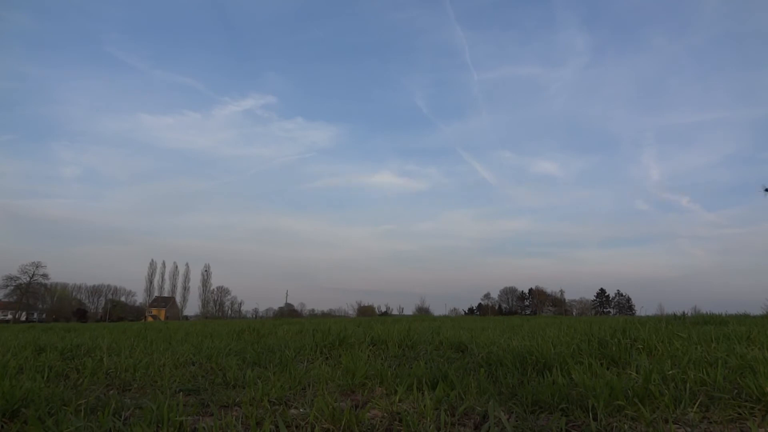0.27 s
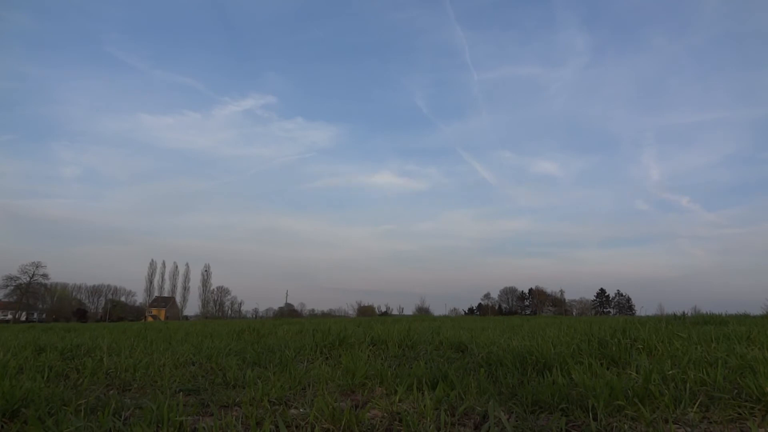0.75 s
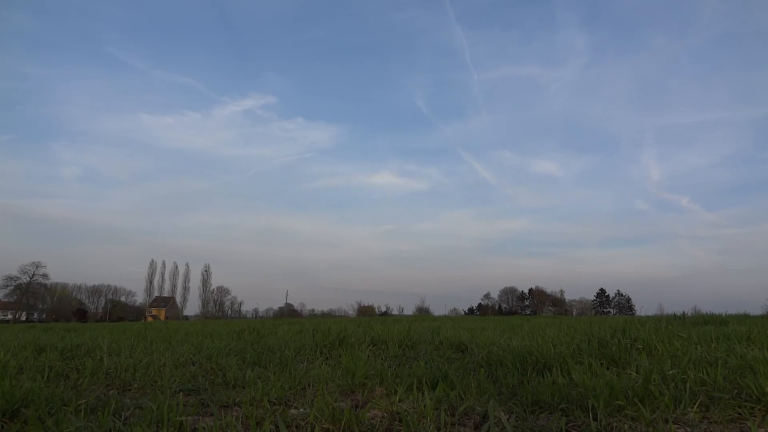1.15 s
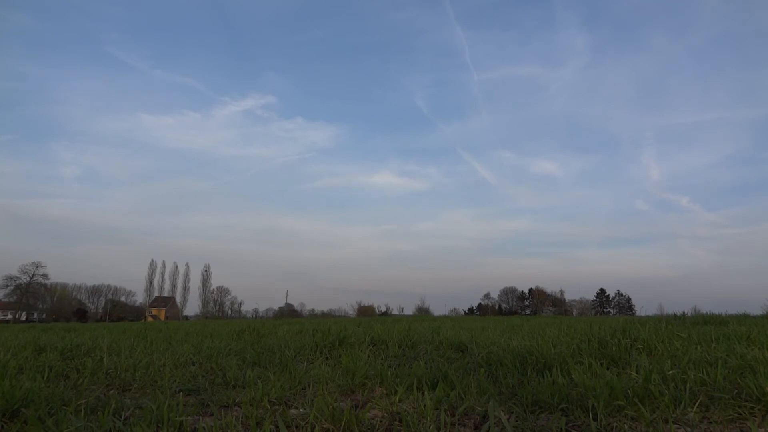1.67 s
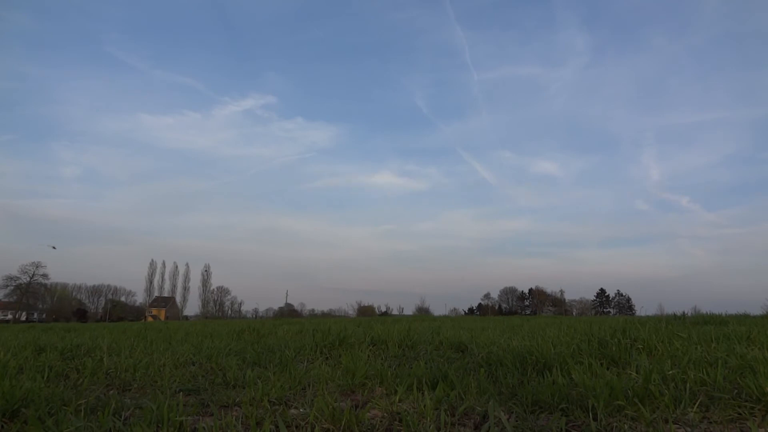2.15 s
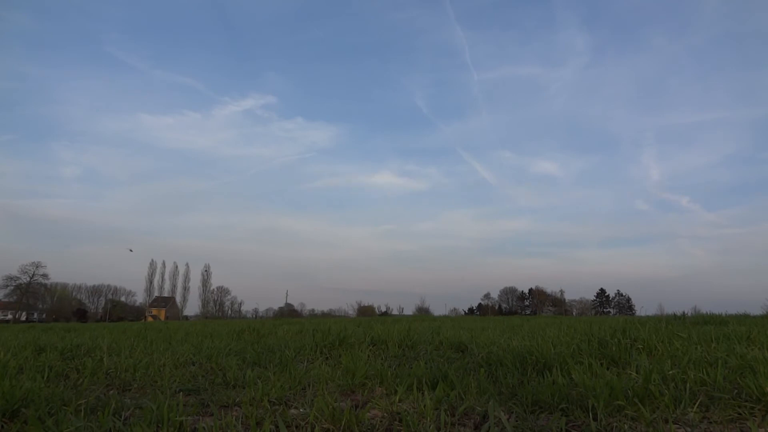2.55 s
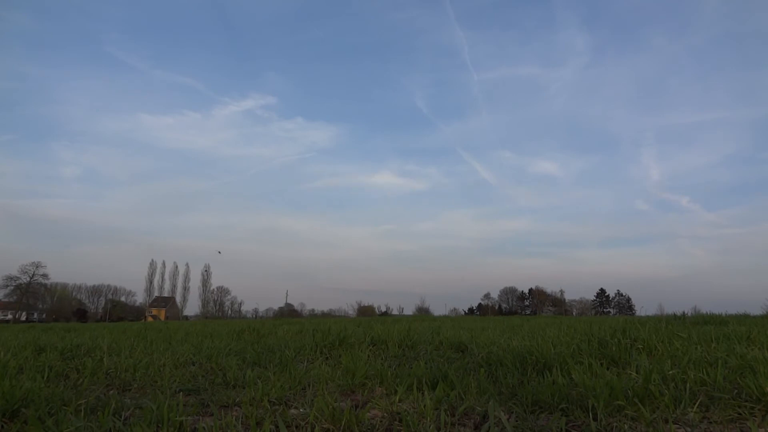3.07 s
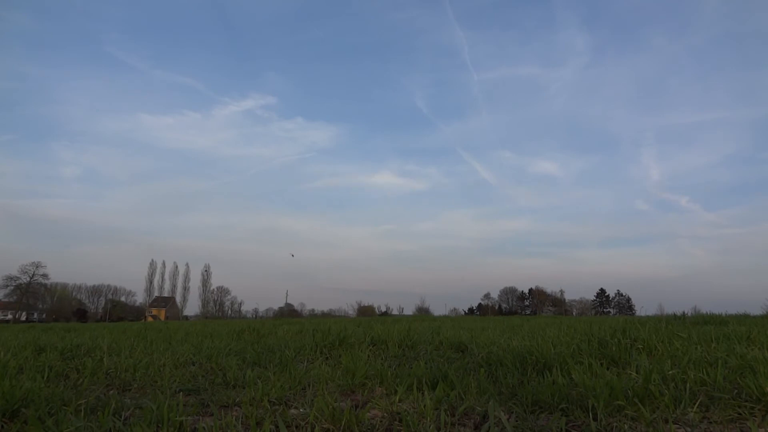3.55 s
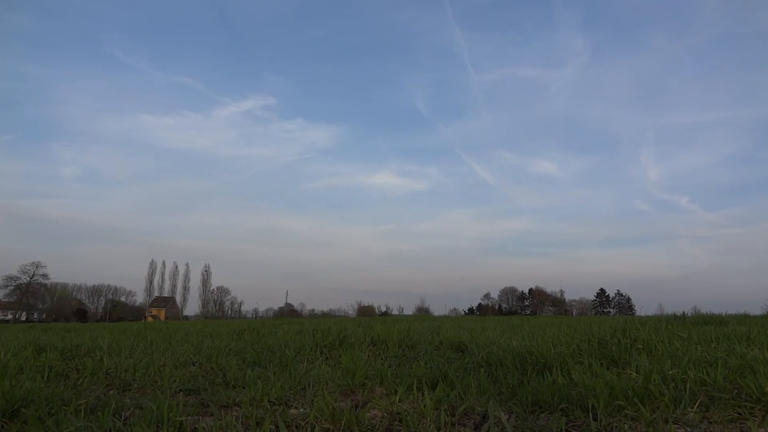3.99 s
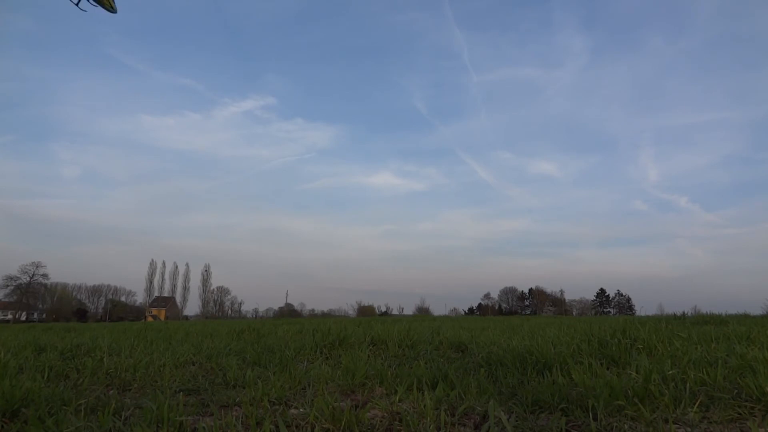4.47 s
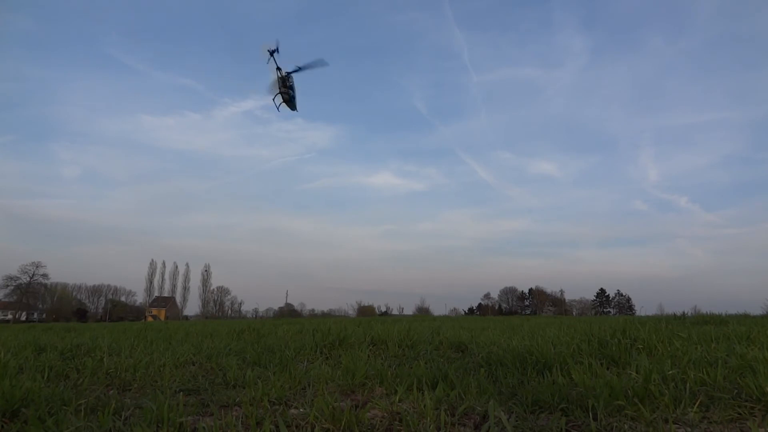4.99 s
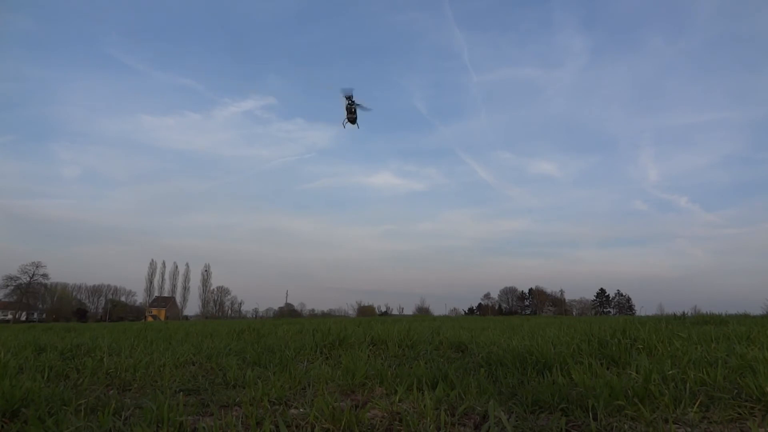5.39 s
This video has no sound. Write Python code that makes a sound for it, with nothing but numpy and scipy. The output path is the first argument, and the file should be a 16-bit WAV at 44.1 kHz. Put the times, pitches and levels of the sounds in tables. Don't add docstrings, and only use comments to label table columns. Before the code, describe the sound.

A toy-sized electric helicopter flies off: bright hiss and a piercing whine drop away within a second or so, flutter in the distance and grow thin. A little past the middle the scene switches without warning to the same machine close by, buzzing, whining and hissing strongly. Open field, dry, no echo, heard through a small camera's stereo microphones.

```python
import sys
import numpy as np
from scipy import signal
from scipy.fft import rfft, irfft, next_fast_len
from scipy.io import wavfile
from scipy.ndimage import uniform_filter1d

SR = 44100
rng = np.random.default_rng(int(sys.argv[2]) if len(sys.argv) > 2 else 0)


def pcm_store(signal):
    levels = np.round(np.clip(np.atleast_2d(signal), -1, 1) * 32767)
    wavfile.write(sys.argv[1], SR, levels.astype(np.int16).T)


def field_ratio(decibels):
    return 10 ** (np.asarray(decibels, dtype=float) / 20)


N = 248283
T = np.arange(N) / SR
CUT_S, CUT_FADE_S = 3.6145, 0.0025
ROTOR, LAY, MOTOR, MESH = 18.61 / 7770, 70 / 7770, 354.8 / 7770, 688.5 / 7770


def curves(rows):
    rows = np.array(rows)
    first = rows[rows[:, 0] < CUT_S].T
    second = rows[rows[:, 0] > CUT_S].T
    fade = np.clip((T - CUT_S) / CUT_FADE_S, 0, 1)
    return [(1 - fade) * np.interp(T, first[0], a) + fade * np.interp(T, second[0], b)
            for a, b in zip(first[1:], second[1:])]


def at_hz(rows, hz):
    f, v = np.transpose(rows)
    return np.interp(np.log(hz + 1.), np.log(f + 1.), v)


def walk(rate):
    hold = int(SR / rate)
    steps = np.repeat(rng.standard_normal(N // hold + 1), hold)
    return uniform_filter1d(uniform_filter1d(steps, hold), hold)[:N]


# pitch_hz, share common to both channels (0 to 1)
LIKENESS = [(60, 0.9), (130, 1), (290, 0.98), (640, 0.52), (1410, 0.65), (3100, 0.9), (6820, 0.94),
            (15000, 0.99)]


def band(hz, octaves):
    size = next_fast_len(N)
    f = np.fft.rfftfreq(size, 1 / SR)
    shape = np.cos(np.pi / 2 * np.clip(np.log2((f + 1) / hz) / octaves, -1, 1))
    noise = rng.standard_normal((2, N))
    mid, side = irfft(rfft(noise, size) * shape)[:, :N] * np.sqrt(SR / 2)
    common = np.clip(at_hz(LIKENESS, hz), 0, 1)
    return np.sqrt((1 + common) / 2) * mid + np.sqrt((1 - common) / 2) * side * np.array([[1], [-1]])


def tone(turns, db, flutter_db, wobble):
    angle = 2 * np.pi * (turns + rng.random()) + wobble * walk(22)
    return np.sqrt(2) * field_ratio(db + flutter_db * walk(14)) * np.sin(angle)


CLOSE_DB = -23
PARTS = {"mesh": (-35, 0.77), "motor": (-35, 0.87), "overtone": (-35.5, 0.5), "whine": (-33, 0.9),
         "below": (-41, 0.91), "above": (-37, 0.89), "minus mesh": (-34.5, 0.88), "plus mesh": (-36.5, 1),
         "octave": (-35, .95), "upper mesh": (-33.5, 0.86), "thrum": (-66, 0.63), "tail 5": (-53.5, 0.17),
         "tail 10": (-46, 0.62), "tail 4": (-77.5, -0.51), "hiss low": (-45.5, 0.6),
         "hiss mid": (-34.5, 0.49), "hiss high": (-34, 0.81), "top loss": (.5, .06), "field": (-7, -0.26)}
GEAR_TURNS = {"mesh": [(0, 0.4, -6.5), (1.5, 0.18, -18), (1.88, .12, -18), (3.9, 0.27, 4)],
              "motor": [(0, 0.48, -20.5), (1.95, 0.081, -19), (1.6, .2, -8.5), (3.55, 0.38, -7),
              (3.62, 0.12, -16), (4.1, .1, -7), (4.55, 0.17, -17)], "upper mesh": [(.3, 0.74, 4.5),
              (1.6, 0.26, 8), (4.4, 0.23, 5)], "overtone": [(.1, 0.21, 3), (.65, 0.098, -4),
              (1.5, 0.31, -9.5), (3.75, 0.2, -4.5), (4.35, .25, 4), (4.72, 0.068, 2.5), (5.3, 0.23, -13)],
              "thrum": [(0, 0.49, 6.5), (1.4, 0.34, -10), (3.6, .2, 4), (3.9, .25, -3.5)],
              "tail 5": [(0.05, 0.37, -11), (1, 0.33, -5), (4.5, 0.29, -14.5)], "tail 10": [(.3, 0.18, -21),
              (1.4, 0.35, -3.5), (2.55, 0.29, -10), (3.65, 0.5, -11), (5.5, 0.4, 8.5)],
              "tail 4": [(.3, 0.38, 14), (1.25, .14, -19), (1.65, .15, 3.5), (3.9, .13, 16),
              (4.55, 0.2, -6)]}
WHINE_TURNS = {"whine": [(.5, 0.26, 3.5), (1.45, .15, 5), (1.88, 0.073, 16), (3.62, 0.024, 9),
               (3.74, 0.054, 7.5), (4.75, .08, 3.5)], "below": [(1.1, 0.31, 16), (1.85, .15, 4),
               (2.65, .25, 9), (3.48, .11, -10), (3.62, .04, -13), (5.25, 0.43, 7)], "above": [(.7, .12, 5),
               (1.01, .07, -8), (1.7, 0.24, 9), (4.07, .07, -9), (4.55, .13, 8), (5.03, 0.11, -18),
               (5.4, 0.098, 7)], "octave": [(.9, .25, -4), (1.6, 0.25, 0), (2.8, .5, -6), (5.2, .3, 2)],
               "minus mesh": [(1.35, 0.4, 6.5), (1.95, 0.11, 3.5), (4.76, 0.08, -1)],
               "plus mesh": [(.58, .07, -16), (1.0, 0.093, -5), (1.28, 0.095, 12), (1.85, 0.14, 11),
               (2.68, 0.1, 11), (3.96, .08, -11), (4.45, 0.14, -12), (5.41, .07, 7)]}
AIR_TURNS = {"hiss low": [(.9, 0.86, -5), (3.65, 0.093, 2)], "hiss mid": [(1.29, 0.076, -4.5),
             (1.7, 0.12, 2.5), (3.65, 0.15, 7), (4.0, .1, -1.5), (4.55, 0.51, 4.5), (5.3, 0.24, 2)],
             "hiss high": [(1.7, 0.76, 2.7), (4.29, 0.22, 2.16)], "top loss": [(1.4, .5, -11.5),
             (3.3, .35, -5), (4.4, 0.16, -2)], "field": [(0.27, 0.85, 12.8)]}


def part(name, near_db):
    close_db, share = PARTS[name]
    level_db = close_db + share * (near_db - CLOSE_DB)
    turns = {**GEAR_TURNS, **WHINE_TURNS, **AIR_TURNS}[name]
    for centre_s, half_s, db in turns:
        same_shot = (T > CUT_S) == (centre_s > CUT_S)
        level_db = level_db + db * np.exp(-.5 * ((T - centre_s) / half_s) ** 2) * same_shot
    return level_db


# pitch_hz, density_db (per Hz)
FIELD = [(15, -69), (25, -30), (366, -9.5), (413, -13.5), (569, -20), (709, -51), (902, -53), (1400, -5),
         (3000, -15), (3900, -48), (6600, -120)]
FIELD_DB = -56.5


def field(duck_db):
    out = sum(field_ratio(at_hz(FIELD, hz) + 2.4 * walk(3.12)) * band(hz, 0.42)
              for hz in 25 * 2 ** np.arange(0, 7.5, .5))
    return field_ratio(FIELD_DB + duck_db) * out / np.sqrt(np.mean(out ** 2))


def downwash(thrum_db):
    return field_ratio(thrum_db - 24.5) * band(127.0, 1.8)


BAND_HZ = [1030, 3900, 6600, 11000, 15000]
# pitch_hz, level_db
HISS = [(60, -19), (140, -30), (400, -13), (470, -12.5), (560, 0.5), (700, -4), (1030, 1), (2000, 0.5),
        (2900, 1.5), (6000, -2), (6600, -2.5), (7200, 5), (8800, 3), (10500, 2.5), (15700, 0)]


def blades(density_db, turns):
    blade_beat = 0.028 * np.sin(4 * np.pi * ROTOR * turns)
    lay_beat = 0.061 * np.sin(4 * np.pi * LAY * turns)
    gust, out = walk(6.5), 0
    for hz in 79 * 2 ** np.arange(0, 7.9, 1 / 3):
        place = np.interp(np.log(hz), np.log(BAND_HZ), np.arange(5))
        k = min(int(place), 3)
        db = density_db[k] + (place - k) * (density_db[k + 1] - density_db[k])
        flicker_db = 0.86 * gust + 0.95 * walk(11) + 1.06 * walk(2.476)
        out = out + field_ratio(db + at_hz(HISS, hz) + flicker_db) * band(hz, 1 / 3)
    return (1 + blade_beat + lay_beat) * out


# low_hz, high_hz
GRASS_HZ = [
    (3250, 4050),
    (1750, 2450),
]
# top hiss at onset [dB], span to full depth [dB], share cancelled
GRAZE_DB = [-36, -45]
GRAZE_SPAN_DB = [14, 5]
GRAZE_SHARE = [.66, .37]
HOVER_SHARE = [.03, .15]
SUNK_SHARE = [.1, .48]
SINK_S = (4.9, 5.2)


def grass(air, near_db):
    for k, edges in enumerate(GRASS_HZ):
        graze = GRAZE_SHARE[k] * np.clip((GRAZE_DB[k] - near_db) / GRAZE_SPAN_DB[k], 0, 1)
        hover = np.interp(T, SINK_S, [HOVER_SHARE[k], SUNK_SHARE[k]])
        bandpass = signal.butter(2, edges, "band", fs=SR, output="sos")
        air = air - np.where(T < CUT_S, graze, hover) * signal.sosfiltfilt(bandpass, air)
    return air


# start_s, pitch_hz
TAIL = [(0, 81.6), (1.2, 80.9), (1.8, 82.1), (2.11, 82.2), (2.41, 82.25), (3.01, 82.7), (3.31, 84),
        (3.6, 84), (3.63, 81.2), (3.9, 81.6), (4.62, 82), (5.13, 82.9), (5.38, 82.1), (5.63, 83.4)]
# shaft multiple, index of the part that sets the level, level_db under it
TAIL_MORE = [(2, 1, -22), (2, 2, -10), (3, 2, -10), (3, 1, -24), (6, 2, -10), (15, 1, -8), (20, 0, -3),
             (25, 0, -6), (30, 0, -8)]


def tail_rotor(near_db):
    level_db = [part(name, near_db) for name in ("tail 5", "tail 10", "tail 4")]
    turns = np.cumsum(curves(TAIL)[0]) / SR
    main = [(5, 0, 0), (10, 1, 0), (4, 2, 0)]
    return sum(tone(n * turns, level_db[int(k)] + db, 2.05, 0.11 + 0.041 * n)
               for n, k, db in main + TAIL_MORE)


# start_s, pitch_hz
SPEED = [(0, 7752), (.27, 7695), (.6, 7674), (.9, 7612), (1.6, 7680), (2.16, 7847), (2.31, 7800),
         (2.8, 7852), (3.18, 7985), (3.614, 8015), (3.619, 7965), (4.04, 7755), (4.27, 7935), (4.42, 7915),
         (4.7, 7750), (4.85, 7806), (4.96, 7758), (5.63, 7782)]
LINES_AT = [(MESH, 0), (MESH - ROTOR, 0), (MESH - LAY, 0), (MESH + LAY, 0), (2 * MOTOR, 1), (2 * MESH, 2),
            (2 * MESH + ROTOR, 2), (2 * MESH - ROTOR, 2), (2 * MESH + LAY, 2), (3 * MESH, 9),
            (3 * MESH + ROTOR, 9), (4 * MESH + ROTOR, 9), (1, 3), (1 + ROTOR, 3), (1 + LAY, 3),
            (1 + 2 * LAY, 3), (1 - LAY * 6, 4), (1 - LAY * 7, 4), (1 + LAY * 6, 5), (1 - MESH, 6),
            (1 - MESH - ROTOR, 6), (1 + MESH, 7), (1 + MESH + ROTOR, 7), (1 + 2 * MESH + ROTOR, 7),
            (1 + MESH + LAY * 6, 7), (2, 8), (2 - LAY * 6, 8), (2 - LAY * 12, 8),
            (2 - LAY * 6 - MESH - ROTOR, 8), (MOTOR * 33, 7), (MOTOR * 15, 3), (4 * MESH + MOTOR, 2)]
LINES_DB = [1.2, -16, -19, -21, 1.2, -.5, -5, -12, -14, -19, -18, -18, -.5, -9, -11, -11, .5, -13, .5, -3.5,
            -2, -2.5, -2.5, -8, -9, -1, -7, -8, -8, -14, -21, -17]
# share of the whine, level_db over the thrum
HUM = [
    (2 * LAY, 0),
    (3 * LAY, 0.5),
    (4 * LAY, -1.2),
    (MOTOR, 0),
    (MESH + MOTOR, 11),
    (3 * MOTOR, 7.2),
    (MESH + 4 * LAY, 0.77),
]


def drive(hiss_db, thrum_db):
    level_db = [part(name, hiss_db) for name in list(PARTS)[:10]]
    turns = np.cumsum(curves(SPEED)[0]) / SR
    lines = sum(tone(share * turns, level_db[k] + db, .7 + 1.8 * share, .05 + 1.2 * np.sqrt(share))
                for (share, k), db in zip(LINES_AT, LINES_DB))
    hum = sum(tone(share * turns, thrum_db + db + 2 * walk(1.28), 1.5, 0.16) for share, db in HUM)
    mesh_db, overtone_db, whine_db, upper_db = level_db[0], level_db[2], level_db[3], level_db[9]
    skirts = [(MESH, mesh_db - 10, 160.), (2 * MESH, overtone_db - 5.5, 90.),
              (2 * MESH, overtone_db - 2.0, 400.), (MESH - 1.9 * LAY, mesh_db - 19.0, 120.),
              (3 * MESH, upper_db - 12.5, 120.), (4 * MESH, upper_db - 11.5, 200.),
              (6 * MESH, upper_db - 9, 200.), (1, whine_db - 15, 400.),
              (1.535, hiss_db - 4.0, 900.),
              (MESH + MOTOR, thrum_db + 16, 250.)]
    rattle = sum(field_ratio(db) * walk(rate) * np.sin(2 * np.pi * share * turns) for share, db, rate in skirts)
    return lines + hum + rattle, turns


# start_s, nearness as top hiss level_db, bearing as left minus right level_db
FLIGHT = [(0, -25.5, -.5), (1.03, -41, -2.5), (1.29, -39, -2.5), (1.64, -43.5, -2.5), (1.9, -44, -2.5),
          (2.25, -48.5, -1), (2.5, -50, -1), (3.58, -49, -1.5), (3.65, -23.5, 1), (3.97, -23, 1),
          (4.29, -24.5, 1.9), (4.6, -24, 1.8), (5.12, -22.5, .5), (5.31, -22.5, 0.8), (5.63, -22.5, 0)]
BAND_WIDTH_HZ = [320, 3500, 600, 6500]


def scene():
    hiss_db, pan_db = curves(FLIGHT)
    loss_db, thrum_db, duck_db = (part(name, hiss_db) for name in ("top loss", "thrum", "field"))
    band_db = [part(name, hiss_db) for name in ("hiss low", "hiss mid", "hiss high")] + [hiss_db]
    density_db = [db - 10 * np.log10(w) for db, w in zip(band_db, BAND_WIDTH_HZ)]
    density_db.append(density_db[-1] + loss_db)
    gears, turns = drive(hiss_db, thrum_db)
    air = grass(blades(density_db, turns), hiss_db)
    machine = gears + tail_rotor(hiss_db) + air + downwash(thrum_db)
    return machine * field_ratio(np.array([pan_db, -pan_db]) / 2) + field(duck_db)


def band_limit(x):
    return signal.sosfilt(signal.butter(12, 17100, fs=SR, output="sos"), x)


# pitch_hz, left lead [radians]
PORT_LEAD = [(0, 0), (340, 0.7), (1030, 1.0), (2330, 0.3), (3100, 0.4), (3700, 0.1), (4130, 0.3),
             (4480, 0.1), (9040, 0.1), (10100, 0.0), (16700, -0.0)]


def record(dry):
    size = next_fast_len(N)
    hz = np.fft.rfftfreq(size, 1 / SR)
    top = np.clip((15730 - hz) / 60, 0, 1)
    lead = np.exp(.5j * at_hz(PORT_LEAD, hz) * np.array([[1], [-1]]))
    wet = irfft(rfft(dry, size) * top * lead, size)[:, :N]
    return band_limit(wet)


dry = scene()
out = record(dry)
pcm_store(out)
```